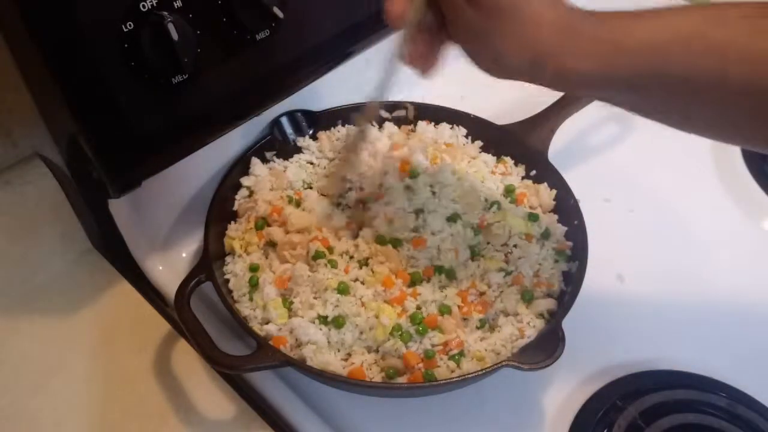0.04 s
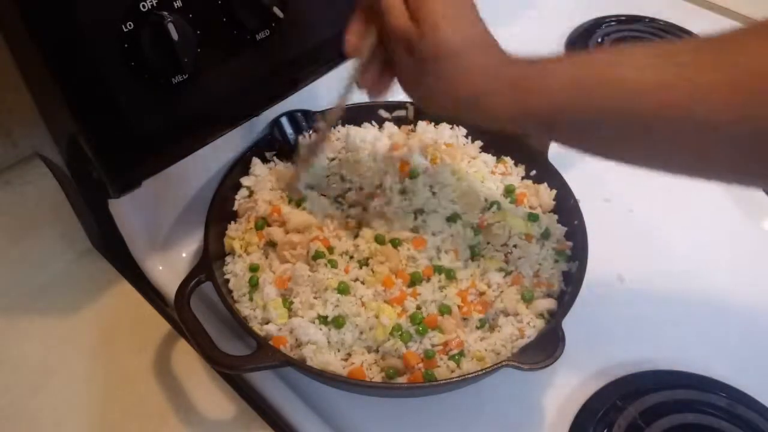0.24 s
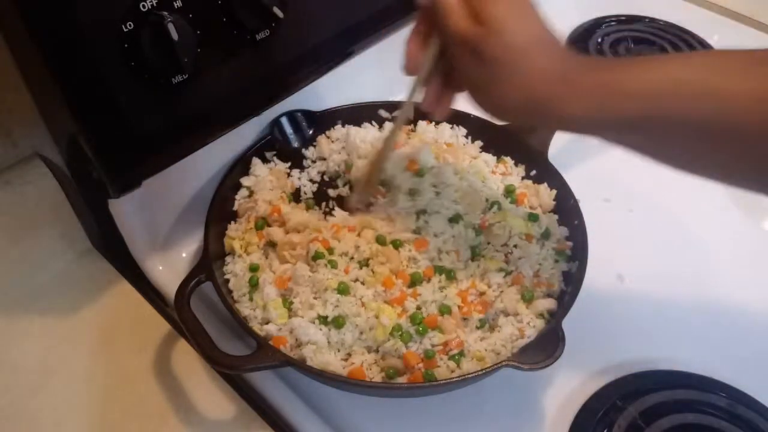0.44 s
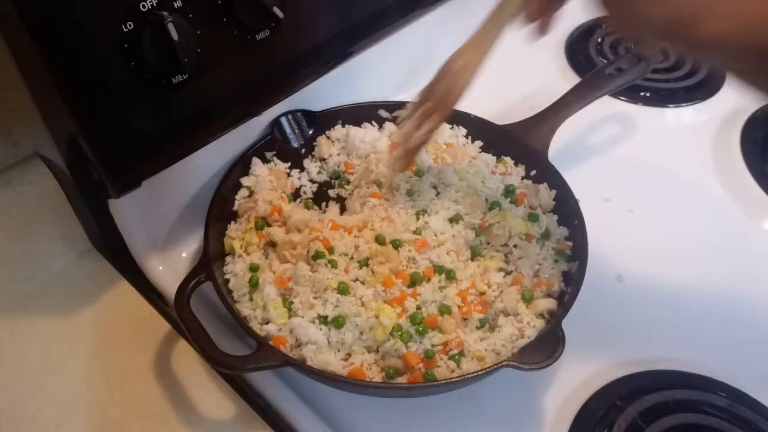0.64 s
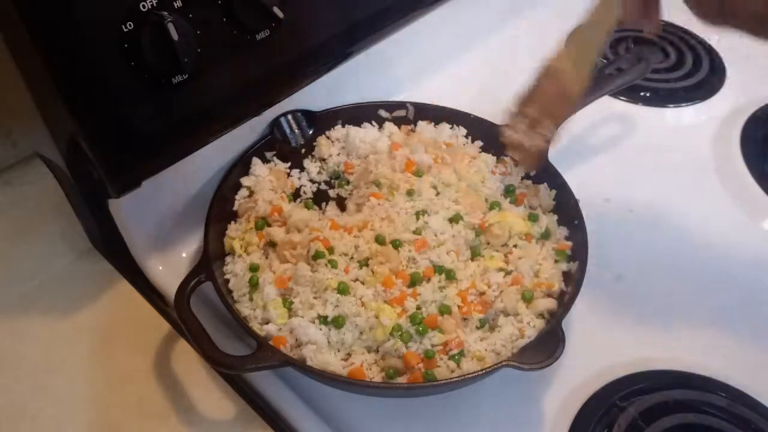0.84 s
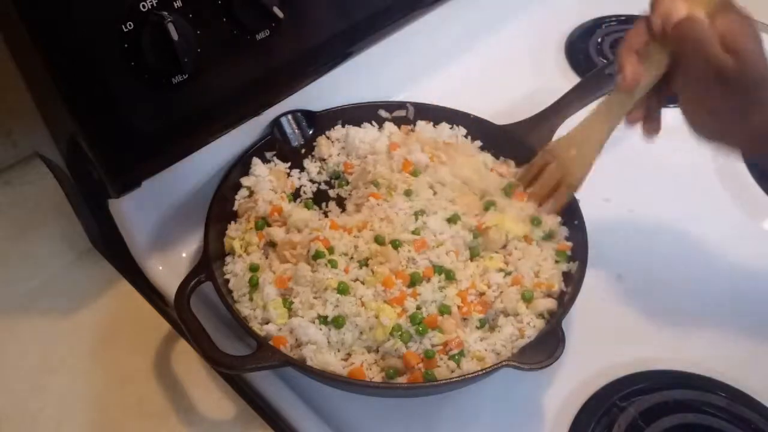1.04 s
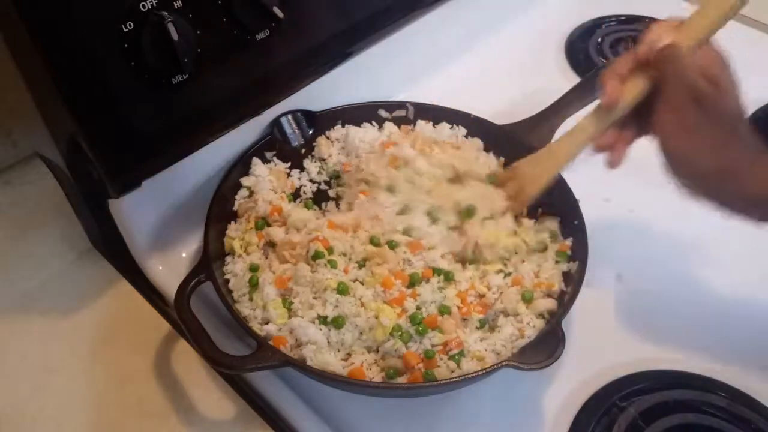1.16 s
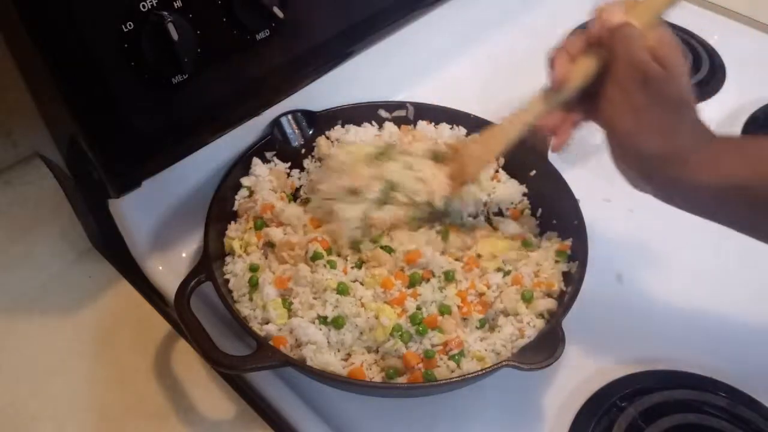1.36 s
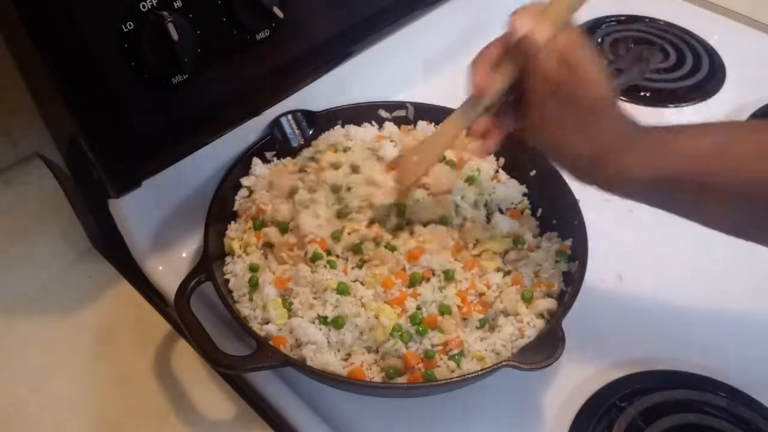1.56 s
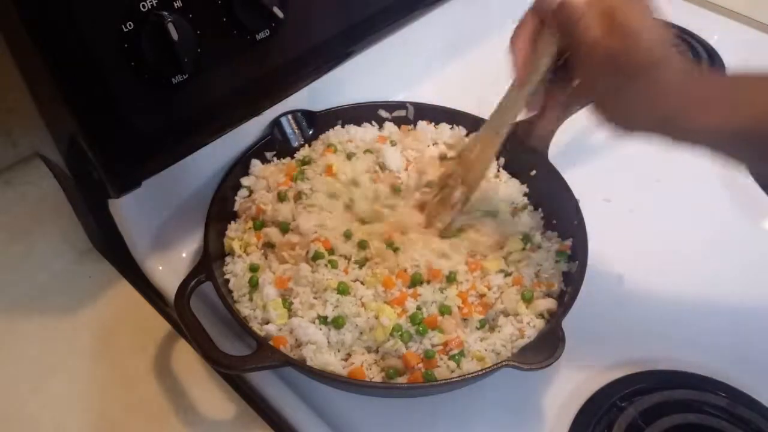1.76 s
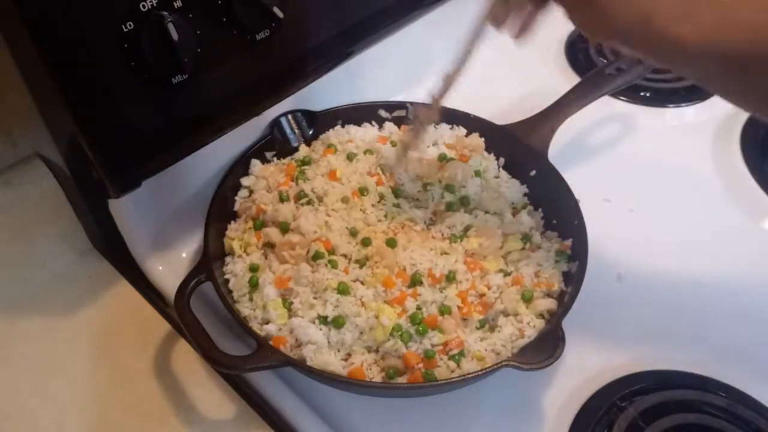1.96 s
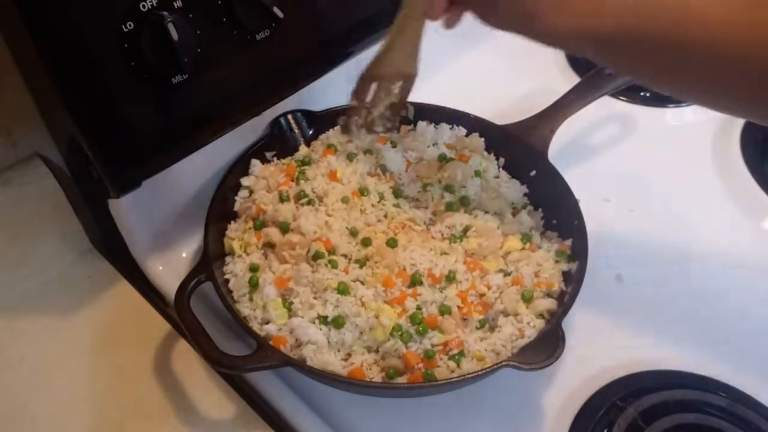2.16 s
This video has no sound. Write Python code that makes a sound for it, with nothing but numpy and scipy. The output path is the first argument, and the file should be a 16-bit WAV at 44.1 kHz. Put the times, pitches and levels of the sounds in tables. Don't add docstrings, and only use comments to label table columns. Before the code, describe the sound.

Spatula against an iron pan: a hard clank with a brief muffled metallic ring and gritty rice crunch, softer knocks and scrapes later, stray grain ticks, very quiet sizzle and hum, close in a hard little kitchen.

```python
import sys
import numpy as np
from scipy import signal
from scipy.fft import rfft, irfft
from scipy.io import wavfile
from scipy.ndimage import uniform_filter1d

SR = 44100
rng = np.random.default_rng(int(sys.argv[2]) if len(sys.argv) > 2 else 0)


def generate_wav(sig):
    pcm = np.round(np.clip(np.atleast_2d(sig).T, -1, 1) * 32767).astype(np.int16)
    wavfile.write(sys.argv[1], SR, pcm)


def gain_from_db(level_db):
    decades = np.asarray(level_db, float) / 20
    return 10 ** decades


N = 97020


def seconds():
    return np.arange(N) / SR


def noise():
    return rng.standard_normal(N)


def unit(x):
    return x / np.sqrt(np.mean(x ** 2) + 1e-30)


def ring(x, hz, t60):
    radius = np.exp(-np.log(1000) / (max(t60, 1e-4) * SR))
    angle = 2 * np.pi * hz / SR
    return signal.lfilter([0, np.sin(angle)], [1, -2 * radius * np.cos(angle), radius * radius], x)


def gain_of(f, tone):
    hz, db = np.transpose(tone)
    return gain_from_db(np.interp(np.log(f), np.log(hz), db))


def colour(x, tone, low_hz, steep):
    f = np.arange(N // 2 + 1) * SR / N + 1e-3
    gain = gain_of(f, tone) / np.sqrt(1 + (low_hz / f) ** steep)
    return unit(irfft(rfft(x) * gain, N))


def highpass(x, order, hz):
    return signal.sosfilt(signal.butter(order, hz, "high", fs=SR, output="sos"), x)


def shape(start, rise, hold, fade):
    u = seconds() - start
    return np.clip(u / max(rise, 1e-4), 0, 1) * np.exp(-np.clip(u - rise - hold, 0, None) / max(fade, 1e-3))


def walk(rate):
    k = int(SR / rate)
    steps = np.repeat(rng.standard_normal(N // k + 1), k)
    return 1.3 * uniform_filter1d(uniform_filter1d(steps, k), k)[:N]


def grit(rate, spread_db):
    happens, sign, size = rng.random((3, N))
    return unit((happens < rate / SR) * np.sign(sign - .5) * gain_from_db(-spread_db * np.log(size + 0.0059)))


def sizzle():
    # t/s, level/dB
    sizzle_level = [(0.0, -60), (0.21, -63), (0.51, -62), (0.75, -62.5), (0.99, -61), (1.21, -59.5),
                    (1.3, -60.5), (1.5, -60.5), (1.8, -60), (1.95, -61), (2.06, -59), (2.2, -60)]
    # f/Hz, level/dB
    sizzle_tone = [(780, 1.5), (1000, 1.5), (2200, 1.5), (4000, -5), (8000, -7.5), (15800, -11)]
    pops = gain_from_db(-1.5) * grit(2500, 3.5)
    hiss = colour(noise() + pops, sizzle_tone, 791, 41)
    low = signal.sosfilt(signal.butter(2, 3800, fs=SR, output="sos"), hiss)
    flicker = low * gain_from_db(1.2 * walk(15.0)) + (hiss - low) * gain_from_db(0.47 * walk(10.8))
    t_s, db = np.transpose(sizzle_level)
    return flicker * gain_from_db(np.interp(seconds(), t_s, db) + 5.5)


def lows():
    # t/s, hum level/dB, air level/dB
    lows_level = [(0, -72, -60.5), (.06, -67, -103), (.19, -63.5, -67), (.5, -72, -62.5),
                  (0.599, -66.5, -69), (.68, -73.5, -82.5), (0.961, -64.5, -73.5), (1.2, -65, -65.5),
                  (1.27, -97.5, -74), (1.32, -89, -80.5), (1.43, -62.5, -83.5), (1.54, -74.5, -83),
                  (1.62, -62, -84), (1.7, -67.5, -74.5), (1.85, -66.5, -68.5), (1.93, -68, -80),
                  (2.2, -67.5, -84)]
    hum_hz, hum_width_hz, rumble_db = 120, 12, -28
    t = seconds()
    hum = np.sqrt(2) * np.sin(2 * np.pi * hum_hz * t + 1.47 * walk(9.5))
    hum = hum + 0.58 * unit(ring(noise(), hum_hz * 1.374, 1.5 / hum_width_hz / 3))
    air = colour(noise(), [(200, 10.5), (500, 12.0), (750, 15), (900, -6)], 170, 2.6)
    air = air * gain_from_db(1.7 * walk(24.92))
    rumble = colour(noise(), [(30, -4), (90, 7), (130, -21), (300, -45)], 15, 4)
    t_s, hum_db, air_db = np.transpose(lows_level)
    hum_level = gain_from_db(np.interp(t, t_s, hum_db))
    air_level = gain_from_db(np.interp(t, t_s, air_db))
    return hum_level * (hum + gain_from_db(rumble_db) * rumble) + air_level * air


def taps():
    # t/s, level/dB, length/s, f/Hz, width/Hz
    tap_list = [(.652, -62, .01, 1550, 900), (.873, -54, .004, 1100, 600), (.891, -54, .004, 1530, 900),
                (1.215, -54, .006, 1560, 1200), (.993, -43.5, .007, 870, 90), (.993, -46, .013, 1115, 40),
                (.995, -48, .008, 2150, 150), (1.026, -40, .007, 1850, 50), (1.028, -48, .012, 1290, 250),
                (.994, -51, .03, 1700, 400), (.996, -46, .012, 330, 120), (1.047, -49, .012, 400, 60),
                (.976, -56, .012, 1250, 400), (1.003, -50, .012, 250, 100), (1.33, -58, .015, 1530, 80),
                (.995, -53, .015, 600, 300), (1.595, -46, .008, 1830, 50), (1.595, -46, .008, 2120, 50),
                (1.598, -53, .008, 840, 130), (1.597, -53, .006, 1150, 120), (1.605, -56, .035, 1450, 40),
                (1.722, -55, .012, 430, 120), (1.737, -52, .016, 455, 50), (1.756, -56, .014, 445, 60),
                (1.785, -59, .006, 420, 150), (1.808, -58, .008, 420, 150)]
    # t/s, level/dB, length/s, f/Hz, width/Hz
    rub_list = [
        (1.724, -62.5, 0.069, 360, 150),
        (1.82, -67.5, 0.066, 520, 290),
        (0.036, -65.5, 0.039, 520, 150),
        (.72, -73, 0.31, 510, 240),
        (1.01, -52.5, 0.051, 530, 320),
        (1.61, -61, 0.18, 800, 400),
        (1.2, -57.5, 0.035, 1500, 1200),
        (1.06, -61, 0.076, 300, 280),
        (1.008, -49, 0.018, 140, 46),
    ]
    noisy_width_hz, rise_s, fade_s = 250, 0.0013, .005
    out, t = 0, seconds()
    for start, db, hold, hz, width in tap_list + rub_list:
        rough = min(width / noisy_width_hz, 1)
        drift = (walk(width) + 1j * walk(width)) / np.sqrt(2)
        sway = np.sqrt(1 - rough ** 2) + rough * drift
        tone = np.imag(sway * np.exp(2j * np.pi * hz * (t - start)))
        out = out + gain_from_db(db) * tone * shape(start, rise_s, hold, fade_s)
    return out


def crunch():
    # t/s, level/dB, rise/s, hold/s, fade/s
    pushes = [
        (0.2058, -40, 0.0018, 0.017, 0.035),
        (0.252, -42.5, 0.0023, 0.0069, 0.0025),
        (0.289, -49.5, 0.047, 0.031, 0.024),
        (0.991, -41, 0.0019, 0.024, 0.011),
        (1.026, -47.5, 0.003, 0.013, 0.026),
        (1.594, -44.5, 0.002, 0.0066, 0.016),
        (1.629, -57, 0.039, 0.042, 0.036),
        (1.18, -67, 0.012, 0.022, 0.018),
        (1.381, -55.5, 0.0033, .003, 0.0054),
        (1.687, -65, 0.011, .01, 0.018),
    ]
    # f/Hz, level/dB
    crunch_tone = [(700, 5), (2000, 3.5), (8000, -4.5), (11000, -3.5), (15800, -5)]
    env = sum(gain_from_db(db) * shape(start, rise, hold, fade) for start, db, rise, hold, fade in pushes)
    grains = grit(5500, 2.9) + 1.03 * noise()
    return env * colour(grains, crunch_tone, 890, 8.4)


def boom():
    # t/s, level/dB, rise/s, fade/s
    shudders = [
        (0.208, -47, 0.0048, 0.16),
        (1.005, -48, 0.04, 0.043),
        (1.07, -60.5, 0.073, 0.045),
    ]
    # f/Hz, level/dB, t60/s
    stove_modes = [(122, 0, .1), (145, 0, .1), (85, -22, .06), (190, -7, .05), (45, -40, .06)]
    env = sum(gain_from_db(db) * shape(start, rise, 0, fade) for start, db, rise, fade in shudders)
    sheet = unit(sum(gain_from_db(db) * unit(ring(noise(), hz, t60)) for hz, db, t60 in stove_modes))
    return highpass(env * sheet, 2, 75)


def ticks():
    # t/s, level/dB, f/Hz, width/Hz
    grain_ticks = [(0.2085, -45, 9000, 5000), (0.2122, -45, 8700, 1500), (.2965, -46, 13000, 4000),
                   (.317, -48, 9100, 3000), (0.328, -51, 9500, 5000), (0.347, -46, 7550, 6000),
                   (.359, -56, 6500, 4000), (1.216, -51, 7000, 5000), (1.92, -58, 13000, 6000),
                   (2.012, -58, 8600, 2000), (2.091, -56, 6960, 5000), (2.135, -57, 12000, 6000),
                   (1.974, -53, 2400, 900)]
    out = 0
    for start, db, hz, width in grain_ticks:
        burst = unit(ring(noise(), hz, 2.32 / width))
        out = out + gain_from_db(db) * burst * shape(start, 0.00037, 0.00091, .002)
    return out


def strike(start, hz, db, t60, swell):
    u = np.clip(seconds() - start, 0, None)
    env = (1 - np.exp(-u / max(swell, 1e-4))) * np.exp(-np.log(1000) * u / max(t60, .005))
    return gain_from_db(db) * np.sin(2 * np.pi * hz * u) * env


def pan_ring(knock_s):
    # level/dB, t60/s, swell/s, muffled after/s
    pan_modes = [(-13.5, 0.28, 0.0035, .08), (-15.5, 0.44, 0.012, 0.069), (-9.5, 0.16, 0.0015, .03),
                 (-2, 0.24, 0.0045, .056), (1, 0.43, 0.013, 0.034), (-14.5, 0.42, 0.011, .03),
                 (-24, .15, 0.0017, 0.04), (-39, 0.035, 0.0046, .05), (-9.5, 0.22, 0.0028, .09),
                 (-10, 0.26, 0.003, 0.033), (-17, .14, 0.0047, .06), (-13, 0.32, 0.003, 0.037),
                 (-13.5, 0.28, 0.0099, .03), (-19.5, .15, 0.004, 0.044)]
    pan_hz = [343, 389, 453, 560, 814, 875, 1085, 1200, 1356, 1500, 1776, 1885, 2296, 2859]
    # level/dB, t60/s, swell/s, muffled after/s
    burner_modes = [(-21, 1.07, 0.037, 0.2), (-23.5, 1.4, 0.042, 0.2), (-37.5, 1.1, 0.087, 0.33),
                    (-21, .5, 0.0231, 0.12), (-19.5, 0.93, .03, 0.134), (-21.5, 0.7, 0.032, 0.134),
                    (-34, 0.43, .04, 0.14), (-21.5, 0.41, 0.031, 0.17), (-36.5, .4, 0.029, .12),
                    (-33, .6, 0.032, .16)]
    burner_hz = [346, 553, 541, 834, 931, 978, 1626, 1986, 2293, 458]
    knock_db, damp_db, muffle_s, roughness = -16.5, -20.5, 0.0042, .15
    out = 0
    for hz, (db, t60, swell, after) in zip(pan_hz + burner_hz, pan_modes + burner_modes):
        start = knock_s + rng.random() / hz
        tone = strike(start, hz, knock_db + db, t60, swell) * (1 + roughness * walk(41.6))
        until_muffled = np.clip((knock_s + after - seconds()) / muffle_s, -50, 50)
        out = out + tone * gain_from_db(damp_db / (1 + np.exp(until_muffled)))
    return out


def clack(knock_s):
    tone = [(500, 4), (740, -2), (1000, 1.5), (2500, -8), (4500, -13), (7000, -24)]
    return gain_from_db(-32) * colour(noise(), tone, 380, 4.8) * shape(knock_s, 0.0062, 0.0058, .013)


def rim_chink():
    # level/dB, t60/s
    rim_modes = [(4, 0.024), (-2.5, .03), (-8.5, 0.043), (0, 0.029), (-12, .02)]
    rim_hz = [8694, 12590, 6202, 3600, 7600]
    return sum(strike(.2545, hz, -26.5 + db, t60, 0.0092) for hz, (db, t60) in zip(rim_hz, rim_modes))


def room(x):
    t60_s, treble_hz, level_db, rise_s = 0.58, 2400, -10, 0.0093
    u = np.arange(int(.7 * SR)) / SR
    hiss = rng.standard_normal(len(u))
    low = signal.sosfilt(signal.butter(1, treble_hz, fs=SR, output="sos"), hiss)
    tail = low + (hiss - low) * np.exp(-u / 0.011)
    tail = tail * np.exp(-np.log(1000) * u / t60_s) * (1 - np.exp(-(u / rise_s) ** 2))
    return gain_from_db(level_db) * signal.fftconvolve(x, tail / np.sqrt(np.sum(tail ** 2)))[:N]


def scene():
    knock_s, body_cut_hz = .2088, 200
    iron = highpass(pan_ring(knock_s) + rim_chink(), 4, body_cut_hz)
    wood = highpass(clack(knock_s), 4, body_cut_hz)
    rubbed, stir = taps(), crunch()
    wet = room(gain_from_db(-18) * iron + gain_from_db(6) * wood + gain_from_db(-3) * stir + gain_from_db(-7) * rubbed)
    return (iron + wood + rubbed + stir + wet + boom() + sizzle() + lows() + ticks())[None]


def top_cut(x):
    return signal.sosfilt(signal.butter(12, 15920, fs=SR, output="sos"), x)


def record(dry):
    # f/Hz, level/dB
    mic_tone = [(2400, -0.5), (3900, -10.5), (6200, 0), (7600, -1), (8700, 4.5), (10000, -4), (13700, -11),
                (15000, -5.5)]
    limit, top_hz = 0.98, 15830
    f = np.arange(N // 2 + 1) * SR / N + 1e-3
    heard = irfft(rfft(dry) * gain_of(f, mic_tone), N)
    heard = limit * np.tanh(heard / limit)
    mix = irfft(rfft(heard) * (f < top_hz), N)
    return top_cut(mix)


dry = scene()
out = record(dry)
generate_wav(out)
```